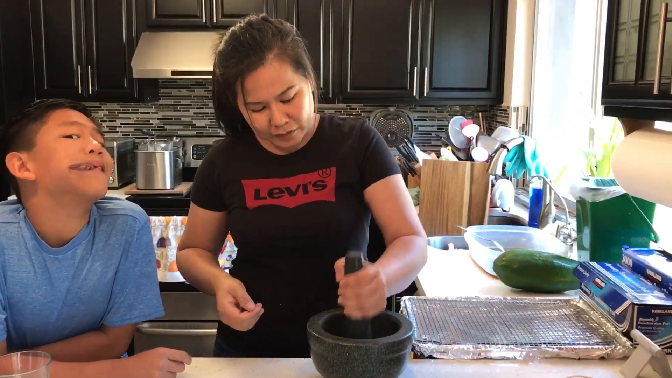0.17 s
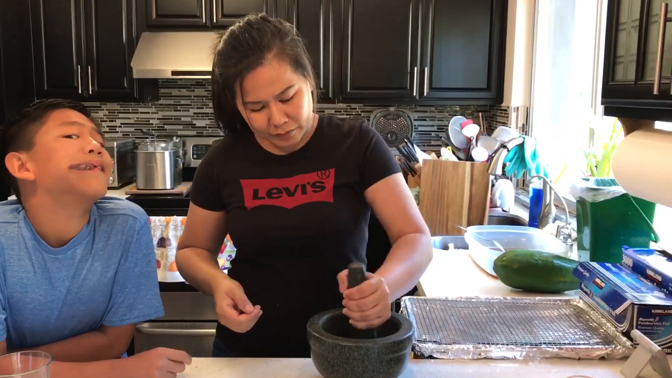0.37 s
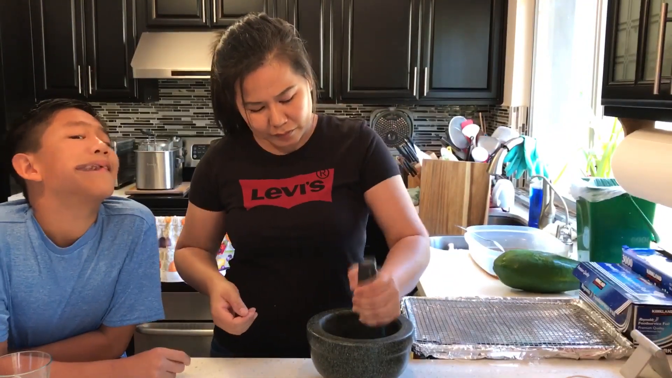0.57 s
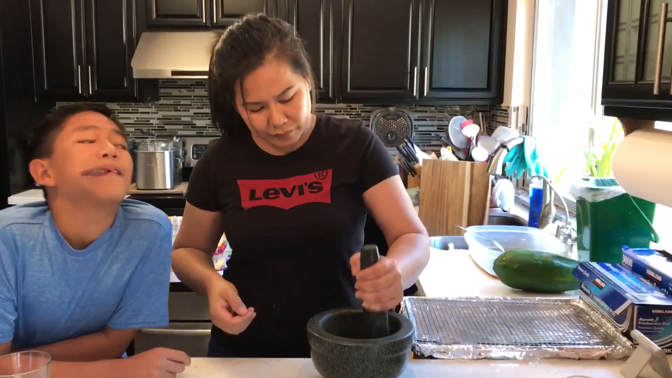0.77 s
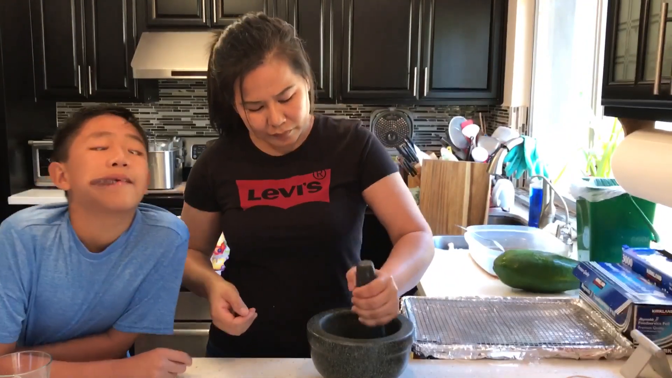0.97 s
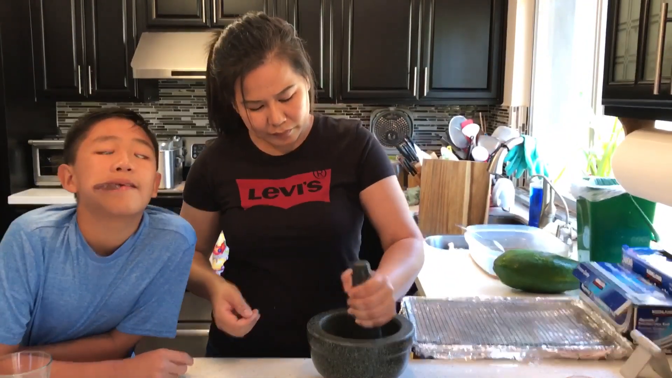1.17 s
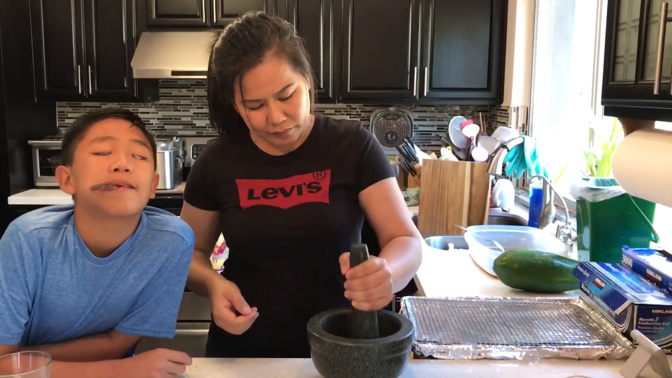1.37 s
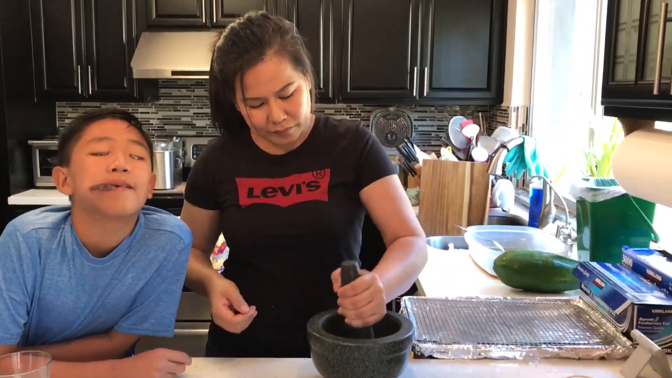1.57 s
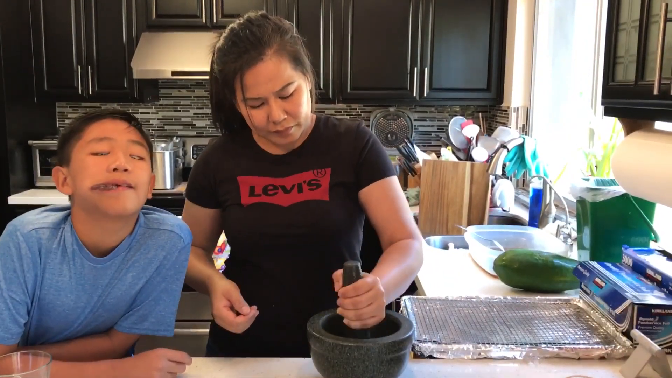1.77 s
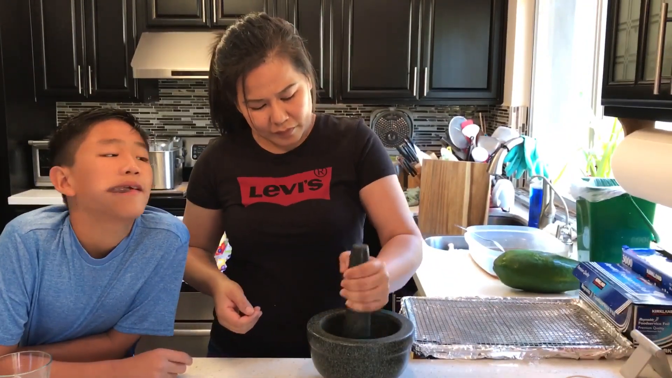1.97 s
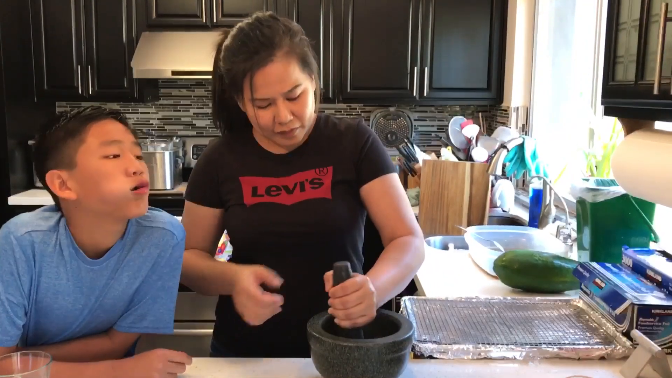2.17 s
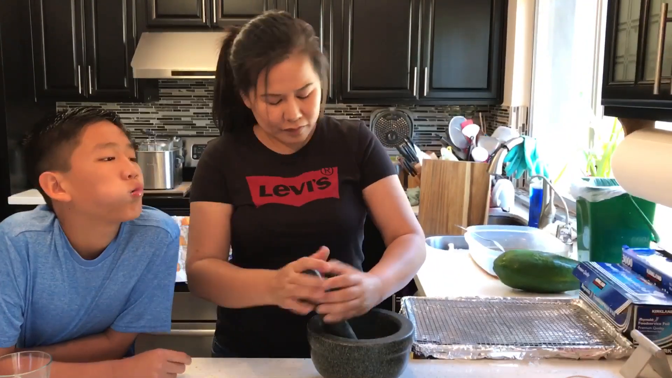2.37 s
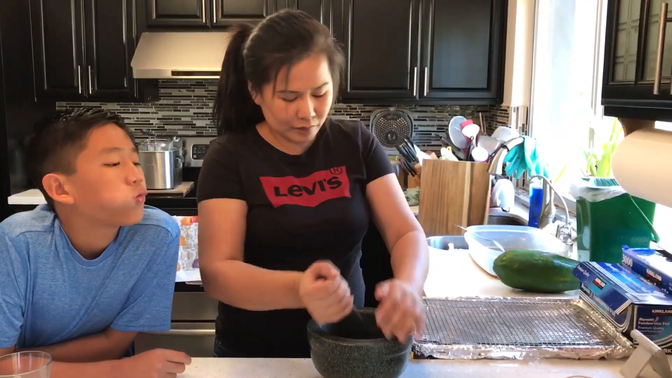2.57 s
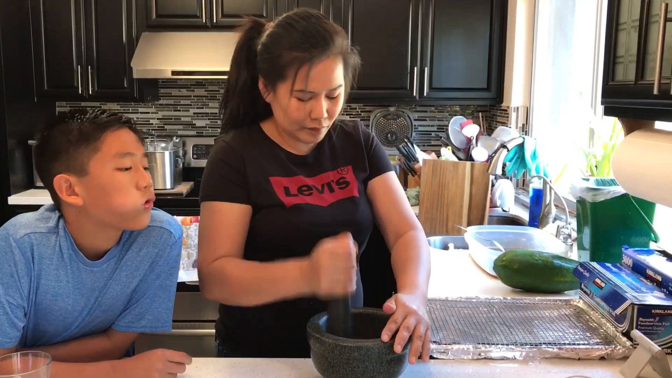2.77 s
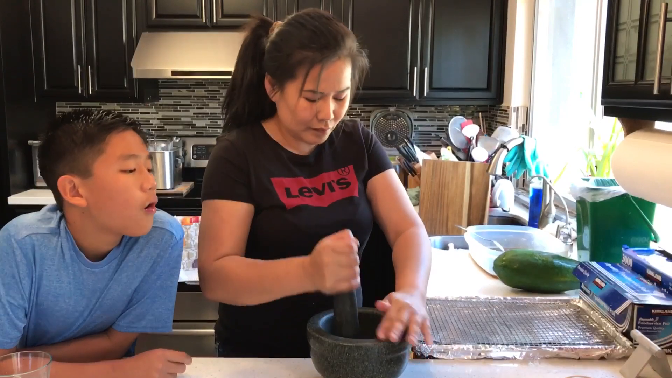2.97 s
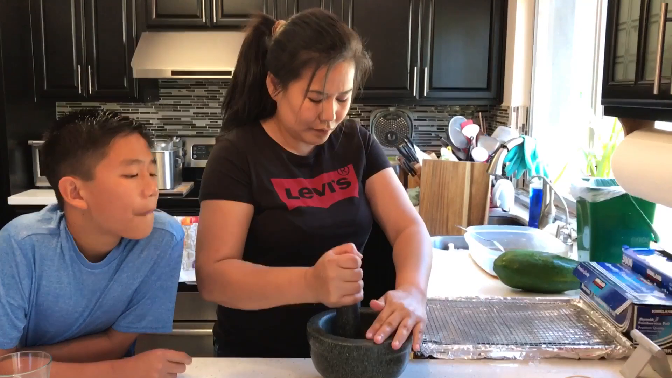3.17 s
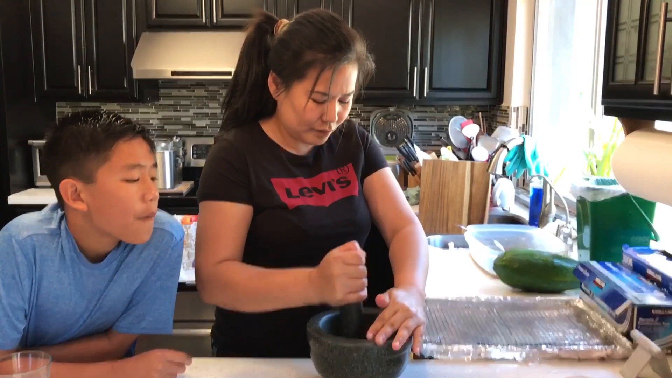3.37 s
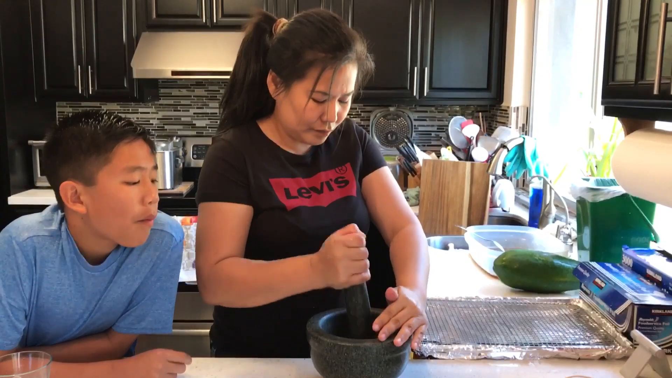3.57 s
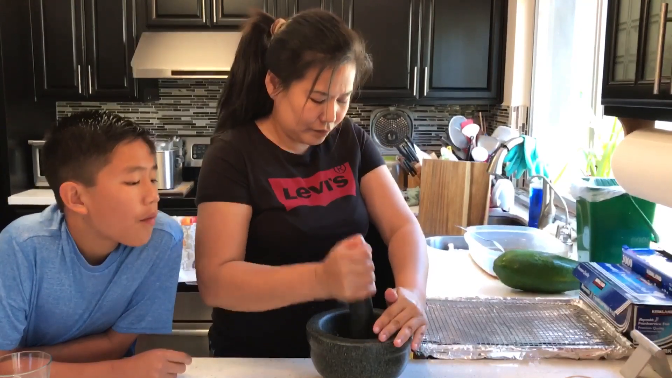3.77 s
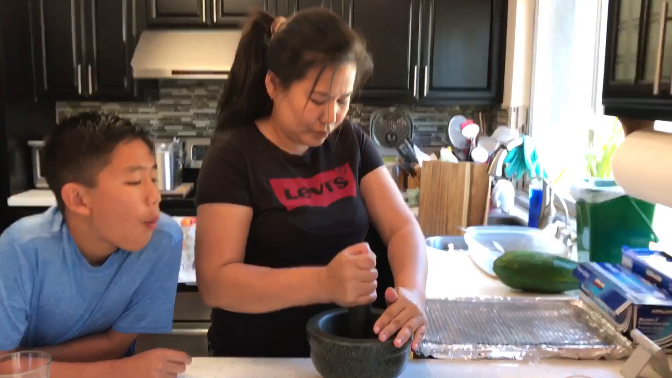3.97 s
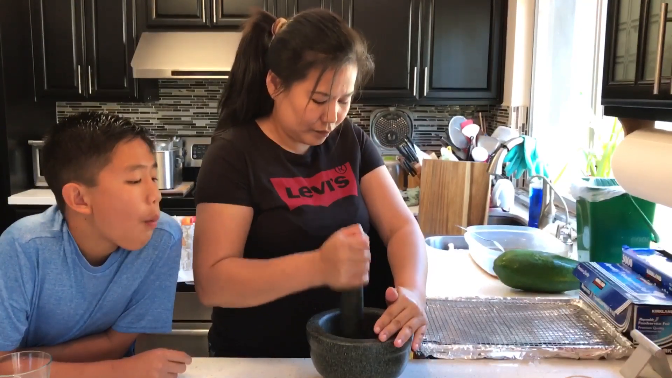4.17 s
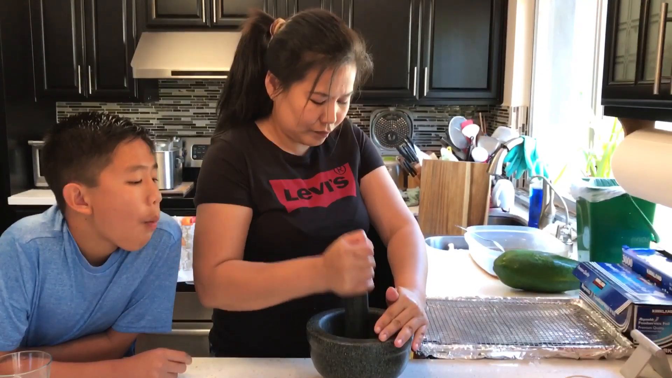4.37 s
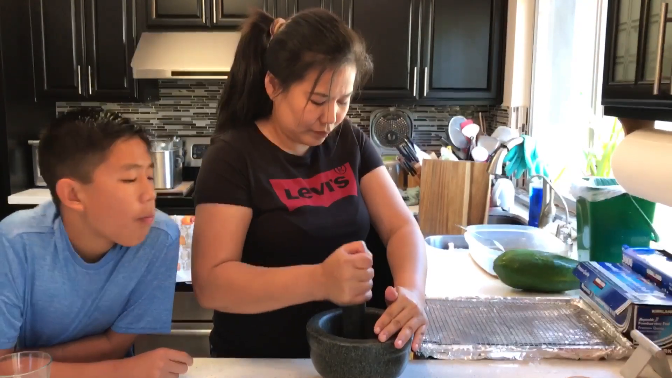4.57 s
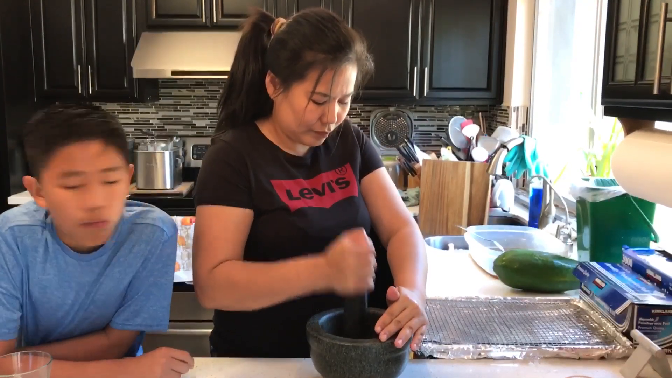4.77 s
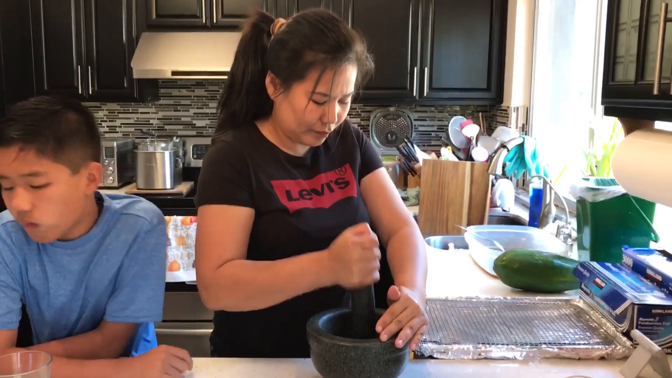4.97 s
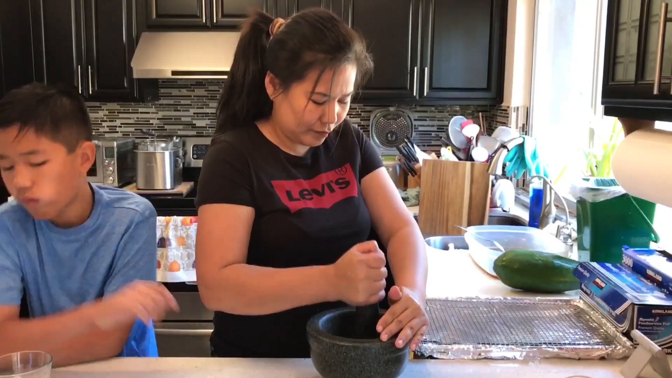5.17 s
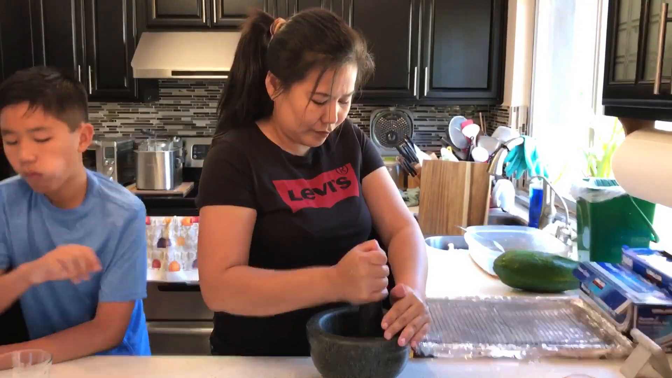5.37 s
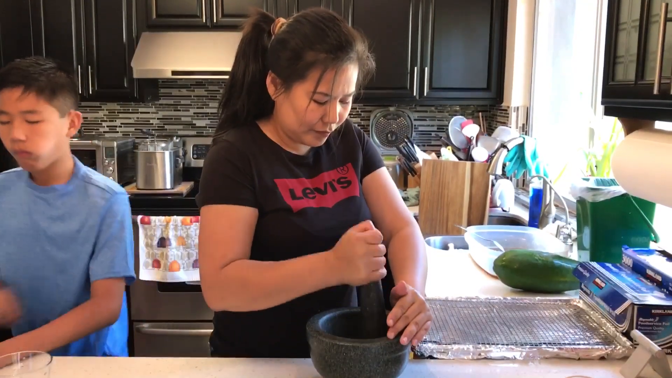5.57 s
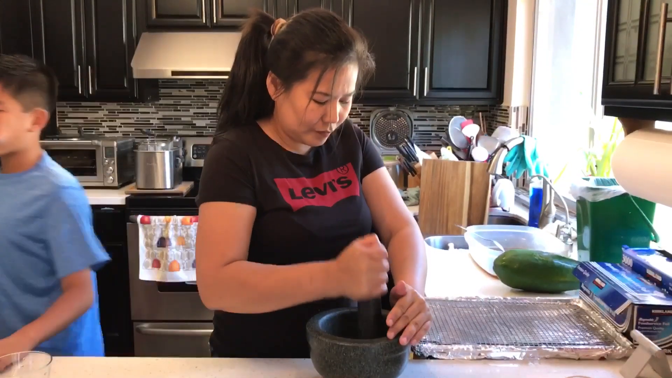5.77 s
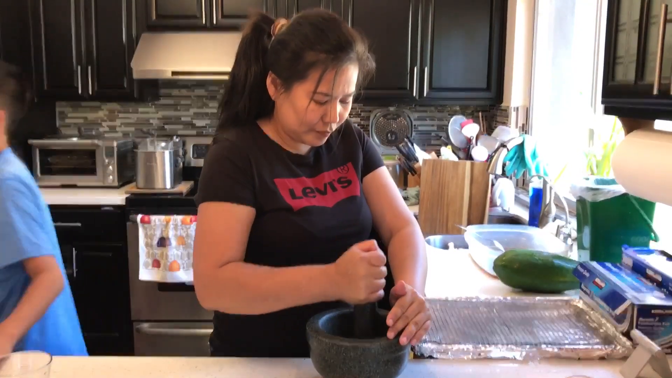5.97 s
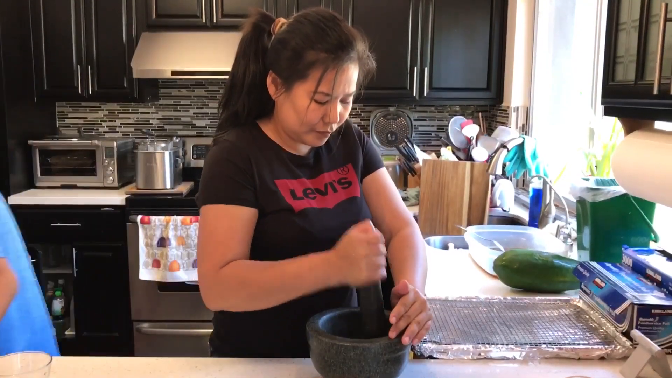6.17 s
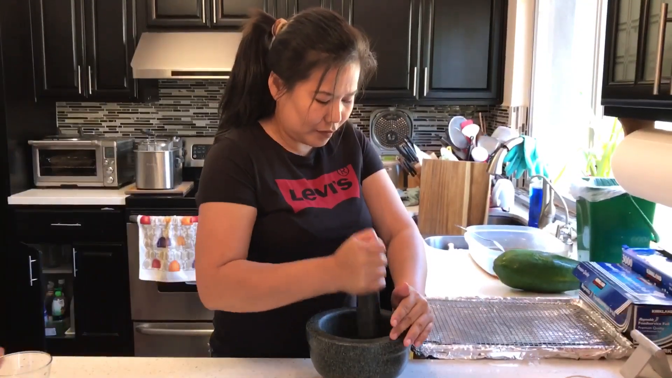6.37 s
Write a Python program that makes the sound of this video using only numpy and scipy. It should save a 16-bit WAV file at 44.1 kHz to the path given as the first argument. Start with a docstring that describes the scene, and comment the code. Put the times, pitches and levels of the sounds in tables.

```python
"""A stone mortar on the counter of a small, echoing kitchen, heard close up through one microphone.
A stone pestle pounds moist paste, about 3.5 blows a second: each squelches, knocks on the bowl and
thuds through the counter. Near 1.8 s the rhythm breaks and the pestle rings on bare stone.
At 2.6 s the hands change grip with a soft rub, and another clink follows. From 3.2 s the pounding
runs on, one hand damping the bowl, while the paste crackles a little louder as it grows stickier."""
import sys
import numpy as np
from scipy import signal
from scipy.fft import rfft, irfft, next_fast_len
from scipy.io import wavfile

SR = 44100
rng = np.random.default_rng(int(sys.argv[2]) if len(sys.argv) > 2 else 0)


def pcm_store(signal):
    """Save signal as 16-bit PCM."""
    levels = np.round(np.clip(np.atleast_2d(signal), -1, 1) * 32767)
    wavfile.write(sys.argv[1], SR, levels.astype(np.int16).T)


N = 282460
AGE = np.arange(int(.7 * SR)) / SR  # time since a blow began [s]
BLOW_WINDOW_S, GRIP_CHANGE_S = .08, 2.6


def from_db(db):
    """Decibels to gain."""
    return 10 ** (np.asarray(db) / 20)


def at_hz(points, hz):
    """Read a table on a log-frequency axis."""
    freqs, values = np.transpose(points)
    return np.interp(np.log(np.maximum(hz, 1)), np.log(freqs), values)


def unit(x):
    """Scale to energy 1."""
    return x / np.sqrt(np.sum(x ** 2) + 1e-20)


def at_level(x, db):
    """Set the rms of the start of a blow."""
    count = int(BLOW_WINDOW_S * SR)
    return x * from_db(db) / np.sqrt(np.mean(x[:count] ** 2) + 1e-20)


def delayed(x, s):
    """The same sound, s seconds later."""
    return np.interp(AGE - s, AGE, x, left=0)


def through(x, response):
    """Pass a blow through an impulse response."""
    return signal.fftconvolve(x, response)[:len(AGE)]


def add(out, s, x):
    """Mix a sound in at time s."""
    i = int(np.clip(round(s * SR), 0, N - 1))
    out[i:i + len(x)] += x[:N - i]


def coloured(x, colour):
    """Causal (minimum-phase) filter that follows a spectrum."""
    size = 2 * next_fast_len(len(x))
    hz = np.arange(size // 2 + 1) * SR / size
    cepstrum = irfft(np.log(from_db(at_hz(colour, hz))))
    cepstrum[1:size // 2] *= 2
    cepstrum[size // 2 + 1:] = 0
    return irfft(rfft(x, size) * np.exp(rfft(cepstrum)))[:len(x)]


def rippled(colour, ripple_db, count=48):
    """The same spectrum with chance peaks and dips."""
    hz = np.geomspace(colour[0][0], colour[-1][0], count)
    return np.transpose([hz, at_hz(colour, hz) + ripple_db * rng.standard_normal(count)])


def dying(t60):
    """Envelope that falls 60 dB in t60 seconds."""
    return np.exp(-np.log(1000) * AGE / t60)


def swell(peak_s, rise_s, fall_s):
    """Envelope that grows to 1 at peak_s and dies away."""
    time = np.arange(N) / SR - peak_s
    return np.exp(np.minimum(time / rise_s, -time / fall_s))


def modes(table):
    """Impulse response of decaying sines, alternating in sign."""
    return sum((-1) ** k * from_db(db) * dying(t60) * np.sin(2 * np.pi * hz * AGE)
               for k, (hz, db, t60) in enumerate(table))


def steady_noise(colour):
    """Coloured noise of rms 1."""
    return unit(coloured(rng.standard_normal(N), colour)) * np.sqrt(N)


def grains(count, grain_db, clump_s):
    """Noise whose strength jumps from one short clump to the next."""
    time = np.arange(count) / SR
    clumps = np.interp(time / clump_s, np.arange(count), rng.standard_normal(count))
    return rng.standard_normal(count) * from_db(grain_db * clumps)


# Still air of the kitchen at the microphone: (frequency [Hz], relative density [dB])
AIR_SPECTRUM = [(20, -19.5), (45, 6.5), (100, -0.5), (200, -6.5), (400, -15.5), (1000, -18.5), (2000, -27),
                (5000, -37.5), (16000, -56)]

def room_tone(level_db=-54):
    """The air of the room, a faint low rush behind everything."""
    return from_db(level_db) * steady_noise(AIR_SPECTRUM)


# Reverberation time of the kitchen: (frequency [Hz], t60 [s])
KITCHEN_DECAY = [(100, 0.34), (400, 0.42), (1200, 0.4), (3000, 0.43), (8000, 0.43), (16000, 0.33)]

def kitchen_tail(build_s=0.00098):
    """Diffuse sound from all round the room: octave bands of noise that build up and die away."""
    out, edges = 0, np.geomspace(70, 18000, 9)
    for low, high in zip(edges, edges[1:]):
        octave = signal.butter(2, [low, high], "band", fs=SR, output="sos")
        band = signal.sosfilt(octave, rng.standard_normal(len(AGE)))
        out = out + band * dying(at_hz(KITCHEN_DECAY, np.sqrt(low * high)))
    return unit(out * (1 - np.exp(-(AGE / build_s) ** 2)))


def in_room(x, tail, wet_db):
    """What reaches the microphone: direct sound plus reverberation."""
    return x + from_db(wet_db) * through(x, tail)


# Juice and air squeezed from the paste in the bowl: (frequency [Hz], relative density [dB])
PASTE_SPECTRUM = [(500, 2.5), (2000, -5), (4400, 1), (4660, 0), (4950, 1), (7000, 0.5), (7800, -4),
                  (9000, 0.5), (10500, -3.5), (13200, -0.5), (15600, -7.5)]

def squelch(tail, lead_s, swell_s, fade_s, grain_db, bright_db, wet_db=-3.5, knee_hz=6500):
    """A spray of tiny bursts that swells as the gap closes and fades when the pestle lands."""
    envelope = np.exp(np.minimum((AGE - lead_s) / swell_s, (lead_s - AGE) / fade_s))
    bursts = unit(envelope * grains(len(AGE), grain_db, clump_s=0.00038))
    reverb = from_db(wet_db) * delayed(tail, lead_s)
    # finer bursts tilt the top end up
    colour = [(hz, db + bright_db * np.log2(max(hz / knee_hz, 1))) for hz, db in PASTE_SPECTRUM]
    return coloured(bursts + reverb, rippled(colour, ripple_db=2.0, count=90))


def sticking(start_db=-80, end_db=-67, ticks_per_s=4, tick_db=-79, tick_s=.0006, spread_db=4):
    """Wet fibres part and snap: sparse ticks, and a crackle that grows as the paste gets stickier."""
    crackle = coloured(grains(N, grain_db=3, clump_s=0.0013), PASTE_SPECTRUM)
    out = from_db(np.linspace(start_db, end_db, N)) * unit(crackle) * np.sqrt(N)
    for s in np.flatnonzero(rng.random(N) < ticks_per_s / SR) / SR:
        snap = rng.standard_normal(2048) * np.exp(-AGE[:2048] / tick_s)
        tick = unit(coloured(snap, rippled(PASTE_SPECTRUM, ripple_db=5)))
        gain = from_db(tick_db + spread_db * rng.standard_normal())
        add(out, s, tick * gain * np.sqrt(BLOW_WINDOW_S * SR))
    return out


# Low rub of the pestle dragged in the bowl: (frequency [Hz], relative density [dB])
RUB_SPECTRUM = [(30, -12), (55, 3.5), (110, 6), (230, 4.5), (400, -6), (1000, -8.5), (2000, -27),
                (5000, -52)]

def handling(rub_db=-44, swish_db=-60):
    """The pestle drags in the paste while the hands change over."""
    rub = swell(GRIP_CHANGE_S, rise_s=0.093, fall_s=0.046) * steady_noise(RUB_SPECTRUM)
    swish = swell(GRIP_CHANGE_S, rise_s=0.39, fall_s=0.061) * steady_noise(PASTE_SPECTRUM)
    return from_db(rub_db) * rub + from_db(swish_db) * swish


# Lone wet smacks down in the bowl: (time [s], level [dB])
PASTE_SMACKS = [(1.851, -45.5), (2.47, -66.5), (2.582, -72), (2.618, -59), (2.8815, -38.5), (3.896, -80),
                (4.498, -76), (4.538, -74), (6.279, -71)]

def smacks(lead_s=0.0017):
    """The paste clicks as the pestle slips into it or pulls free."""
    out = np.zeros(N)
    for s, db in PASTE_SMACKS:
        smack = squelch(kitchen_tail(), lead_s, swell_s=0.00064, fade_s=0.0035, grain_db=3, bright_db=3)
        add(out, s - lead_s, at_level(smack, db))
    return out


# Standing waves of the kitchen: (frequency [Hz], gain [dB], t60 [s])
STANDING_WAVES = [(45.2, -40.5, 0.91), (68.64, -37, 0.75), (97.7, -32, 0.48), (121.9, -35.5, 0.53),
                  (148.9, -23, 0.3), (207.6, -22, 0.27), (232, -34, 0.51)]
# Returns from walls and cabinets, shortest path first: (delay [s], gain [dB])
WALL_ECHOES = [(.0087, -0.5), (0.0222, -4.5), (0.0328, -0.5), (0.047, -3.5), (0.0585, -11.5)]
# The counter right under the mortar: (base frequency [Hz], gain [dB], t60 [s])
COUNTER_MODES = [(191.4, 1, 0.01), (174.4, -1.5, 0.015)]

def thud(tail, cushion_s, stiff_s=0.0014, softening=0.27, spread=0.28, sharpening=0.099,
         yield_s=0.002, wander=0.015):
    """The blow pushes the counter; the boom bounces between the walls and wakes the standing waves."""
    push_s = (stiff_s + softening * cushion_s) * np.exp(spread * rng.standard_normal())
    push = np.sin(np.pi * np.minimum(AGE / push_s, 1)) ** 2
    # a bare contact is a stiffer spring, so the mortar bounces at a higher pitch; the grip varies it too
    pitch = 1 + sharpening * np.exp(-cushion_s / yield_s) + wander * rng.standard_normal()
    direct = through(push, modes([(hz * pitch, db, t60) for hz, db, t60 in COUNTER_MODES]))
    echoes = sum(from_db(db) * delayed(direct, s) for s, db in WALL_ECHOES)
    standing = through(push, modes(STANDING_WAVES)) / pitch ** 2
    return in_room(direct, tail, wet_db=0.5) + echoes - standing


# The spot where stone meets stone: (frequency [Hz], relative density [dB])
CONTACT_SPECTRUM = [(130, -21), (245, 5.5), (340, 0.5), (480, -0.5), (700, 3), (1100, 1.5), (2000, -2.5),
                    (3000, -3.5), (4400, -6.5), (5500, -18), (16000, -22.5)]

def stone_contact(tail, hard_hz, cushion_s, rebound_s, rocking_db=0, crush_s=.0055, hop_s=.011,
                  wet_db=2, crack_db=1, crack_s=0.0012, yield_s=0.0042):
    """Stone grinds onto stone and the bowl rocks back; paste between them draws the contact out."""
    attack = 1 - np.exp(-(AGE / (0.88 * cushion_s)) ** 2)
    envelope = attack * np.exp(-AGE / (crush_s + 0.87 * cushion_s))
    strike, landing, chips = rng.standard_normal((3, len(AGE)))
    # the longer the bowl hops, the harder it lands
    grind = unit(strike * envelope + (rebound_s / hop_s) ** 2 * delayed(landing * envelope, rebound_s))
    # bare stone adds a compact crack that paste swallows
    crack = from_db(crack_db) * np.exp(-cushion_s / yield_s) * unit(chips * AGE * np.exp(-AGE / crack_s))
    reverb = from_db(wet_db) * delayed(tail, cushion_s)
    rocking_hz, width_octaves = 486, 0.38
    colour = [(hz, db + rocking_db * np.exp(-(np.log2(hz / rocking_hz) / width_octaves) ** 2))
              for hz, db in CONTACT_SPECTRUM]
    contact = coloured(grind + crack + reverb, rippled(colour, ripple_db=1.87))
    return signal.sosfilt(signal.butter(2, hard_hz, fs=SR, output="sos"), contact)


# The heavy bowl on the counter: (frequency [Hz], gain [dB], t60 [s], loss under the hand [dB])
BOWL_MODES = [(370, 21, 0.06, 4), (410, 22, .045, 2.5), (466, 11.5, .04, 7), (634.5, 20.5, 0.076, 4),
              (800, 13, 0.03, 7.5), (997, 17.5, 0.2, -3.5), (1323, 6, 0.05, 1), (1689, 4, 0.085, 4.5),
              (2312, 4, .04, 0)]

def knock(contact, held, bowl_db=-15, spot_db=8.0):
    """The contact and the ring it wakes in the bowl; each spot struck favours other modes."""
    bowl = modes([(hz, db - held * loss_db + spot_db * rng.standard_normal(), t60)
                  for hz, db, t60, loss_db in BOWL_MODES])
    return unit(contact) + from_db(bowl_db) * unit(through(contact, bowl))


# The pestle, damped by the fist: (frequency [Hz], gain [dB], t60 [s])
PESTLE_MODES = [(3099, 7, 0.064), (3213, -1, .045), (4536, -15, 0.074), (4637, -14, 0.064),
                (6500, -31.5, 0.062), (6950, -31, .05), (8550, -29.5, 0.1), (10800, -41, .06),
                (11620, -39.5, .06)]

def pestle_ring(tail, skip=0):
    """The stone rod rings in its modes, less the lowest `skip` of them."""
    return in_room(modes(PESTLE_MODES[skip:]), tail, wet_db=-5.5)


# The pestle catches the bare wall of the bowl: (time [s], knock level [dB], ring level [dB])
BARE_HITS = [(1.7585, -33, -30.5), (1.849, -17, -26.5), (2.851, -73, -65), (2.8708, -22, -20),
             (3.113, -51, -67.5), (3.99, -62, -54.5), (5.45, -58, -53)]

def clinks(cushion_s=0.00025, thud_below_db=11):
    """Bare stone on stone, short and hard: a sharp knock, a clear ring and only a light thud."""
    out = np.zeros(N)
    for s, knock_db, ring_db in BARE_HITS:
        tail = kitchen_tail()
        add(out, s, at_level(thud(tail, cushion_s), knock_db - thud_below_db))
        contact = stone_contact(tail, hard_hz=2100, cushion_s=cushion_s, rebound_s=.0038)
        add(out, s, at_level(knock(contact, held=s > GRIP_CHANGE_S), knock_db))
        add(out, s, at_level(pestle_ring(tail), ring_db))
    return out


# Blows into the paste, in front of the microphone:
# (time [s], thud level [dB], knock level [dB], squelch level [dB], cushioning by the paste [s])
BLOWS = [(0.108, -29, -37, -45.5, .0023), (0.3966, -34.5, -37, -40.5, .0012),
         (0.6768, -26, -32, -44.5, 0.0059), (0.9602, -24, -28.5, -43, 0.0039),
         (1.2564, -26, -33, -45.5, 0.0057), (1.553, -28, -35, -43, 0.0028),
         (2.1345, -23.5, -18.5, -45, 0.001264), (3.1711, -21.5, -27.5, -43, 0.0033),
         (3.4556, -23.5, -26.5, -39.5, .0028), (3.738, -22, -25.5, -43, 0.0032),
         (4.032, -23.5, -25.5, -39.5, .003), (4.308, -26, -30.5, -41.5, 0.0035),
         (4.6012, -22.5, -24, -44, .0025), (4.889, -23.5, -33.5, -40.5, 0.0055),
         (5.172, -25.5, -35.5, -41, 0.004), (5.4504, -24, -40.5, -42, 0.0039),
         (5.74, -24.5, -33.5, -40, .0046), (6.0273, -21.5, -23.5, -42, 0.0031),
         (6.3125, -26.5, -31.5, -39.5, 0.0031)]

def pounding(usual_knock_db=-28.5, usual_hard_hz=1740, octaves_per_db=0.0646, dulling_per_db=1.84,
             overtones_db=-56.5, hand_damping_db=3, lead_s=0.014):
    """Every blow is a thud, a knock, a ring and a squelch, and fills the room in its own way."""
    out = np.zeros(N)
    for s, thud_db, knock_db, squelch_db, cushion_s in BLOWS:
        tail, held = kitchen_tail(), s > GRIP_CHANGE_S
        # a louder knock leaves less paste between the stones: harder contact, more ring, duller squelch
        harder_db = knock_db - usual_knock_db
        hardest_hz = 2500 if held else 1140  # a free bowl gives way, which keeps the contact soft
        hard_hz = min(usual_hard_hz * 2 ** (octaves_per_db * harder_db), hardest_hz)
        ring_db = min(-63 + 5 * harder_db, -56)
        bright_db = 6 - dulling_per_db * max(harder_db, 0)  # per octave
        # a hard blow rocks the free bowl on the counter: a hollow clonk
        rocking_db = 5 if harder_db > 0 and not held else 0
        # thick paste delays the landing on stone and lets the juice out earlier
        rebound_s = .002 + 2.2 * cushion_s
        squelch_peak_s = s + 0.0017 - 0.49 * cushion_s
        swell_s = 0.0002 + 0.39 * cushion_s

        add(out, s, at_level(thud(tail, cushion_s), thud_db))
        contact = stone_contact(tail, hard_hz, cushion_s, rebound_s, rocking_db)
        add(out, s, at_level(knock(contact, held), knock_db))
        add(out, s, at_level(pestle_ring(tail), ring_db))
        # even a soft blow wakes the overtones
        add(out, s, at_level(pestle_ring(tail, skip=2), overtones_db - held * hand_damping_db))
        spray = squelch(kitchen_tail(), lead_s, swell_s, fade_s=0.0047, grain_db=4, bright_db=bright_db)
        add(out, squelch_peak_s - lead_s, at_level(spray, squelch_db))
    return out


def scene():
    """The kitchen from one spot by the counter, in mono: room tone behind, the mortar in front."""
    return (room_tone() + pounding() + clinks() + smacks() + handling() + sticking())[None]


def record(dry, ceiling=2.0, low_cut_hz=32, high_cut_hz=15900):
    """The microphone drops the deepest bass, the highest peaks are rounded and the top is cut."""
    low_cut = signal.butter(2, low_cut_hz, "high", fs=SR, output="sos")
    high_cut = signal.ellip(10, .1, 80, high_cut_hz, fs=SR, output="sos")
    rounded = ceiling * np.tanh(signal.sosfilt(low_cut, dry) / ceiling)
    return signal.sosfilt(high_cut, rounded)


dry = scene()
out = record(dry)
pcm_store(out)
```